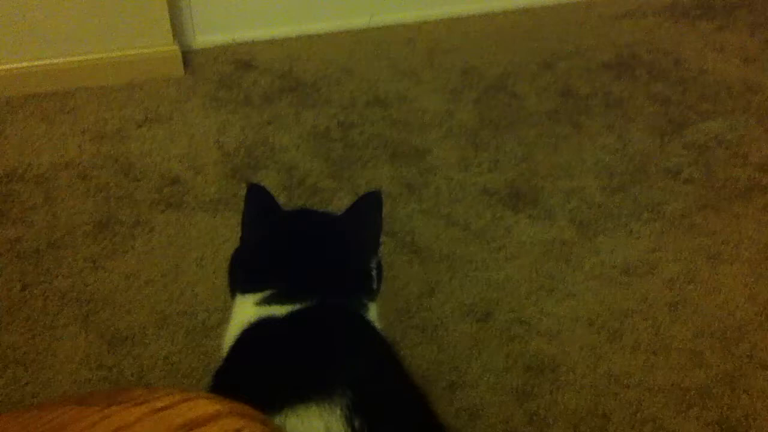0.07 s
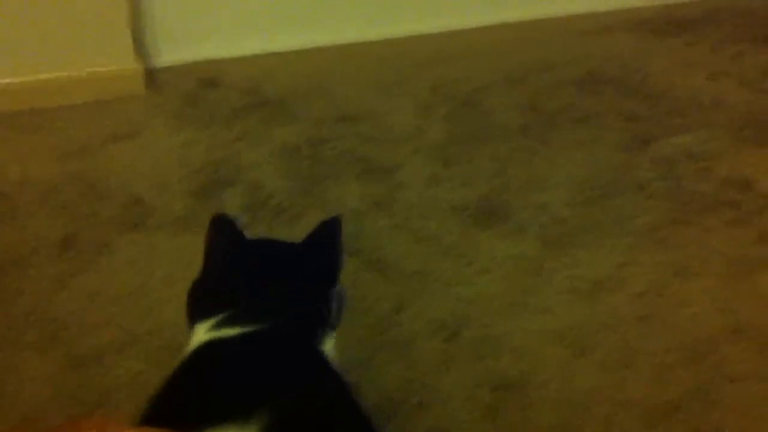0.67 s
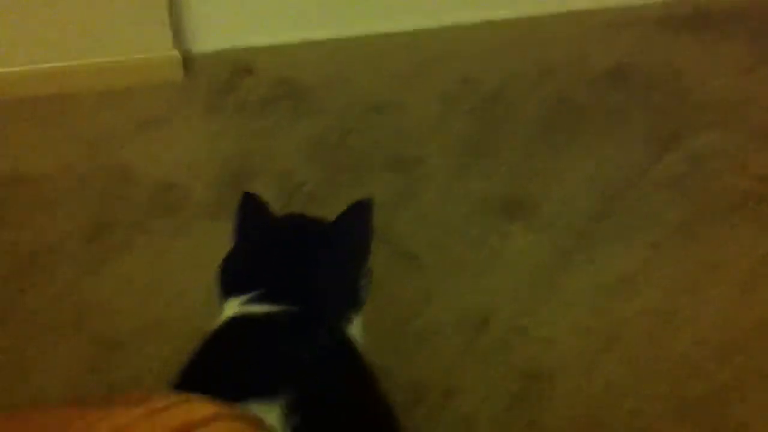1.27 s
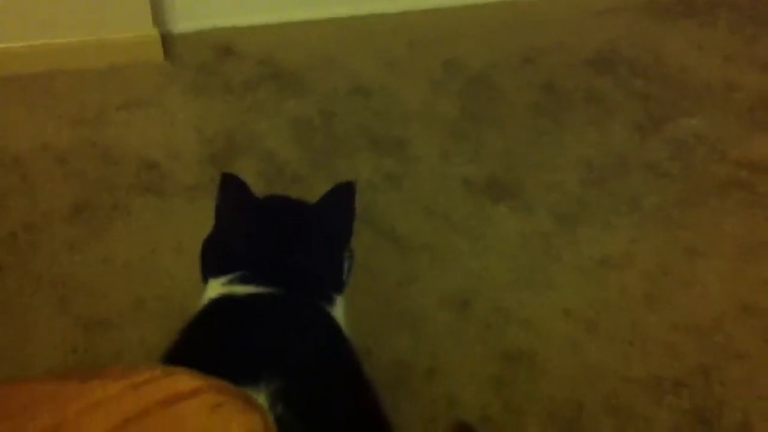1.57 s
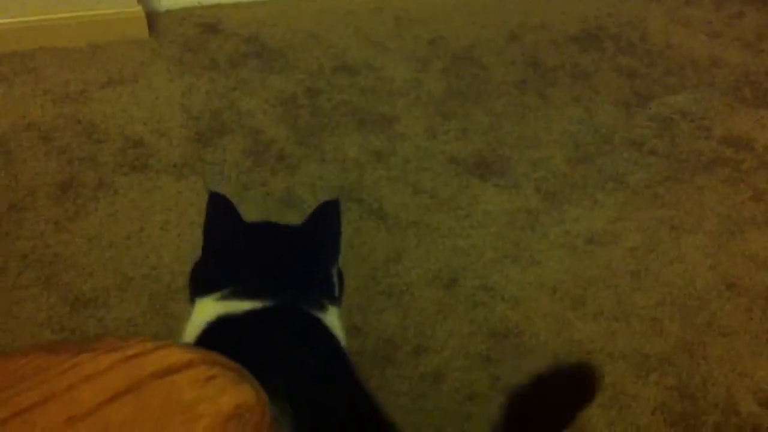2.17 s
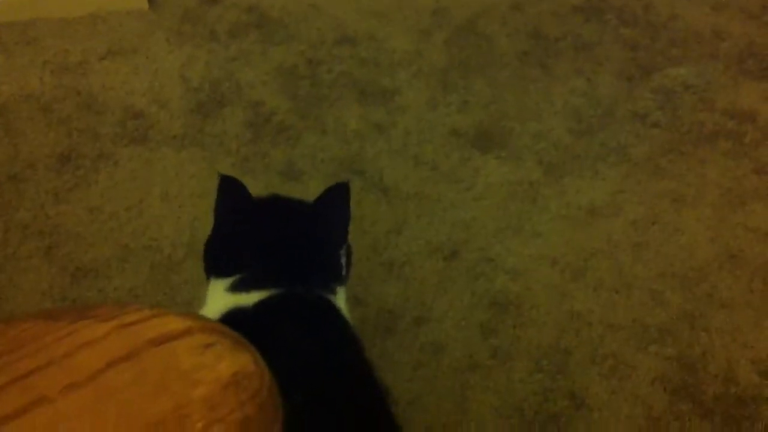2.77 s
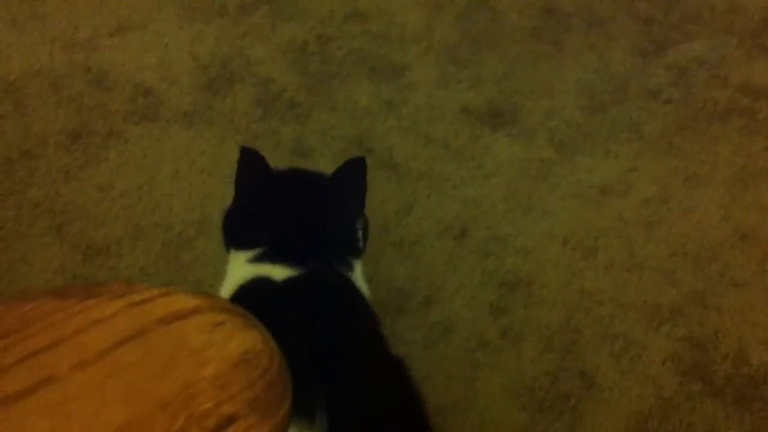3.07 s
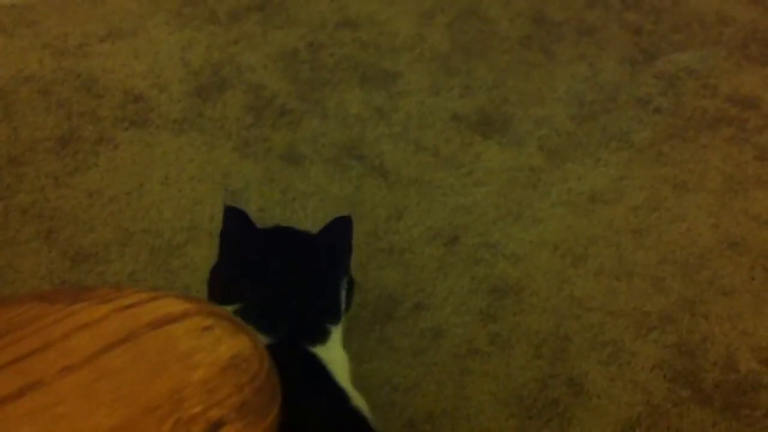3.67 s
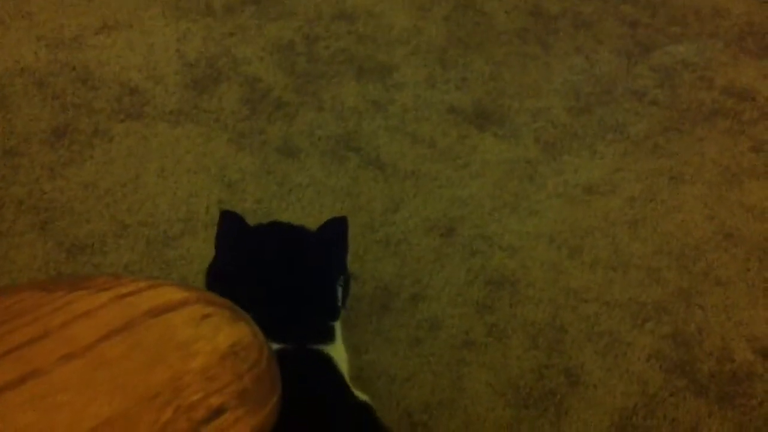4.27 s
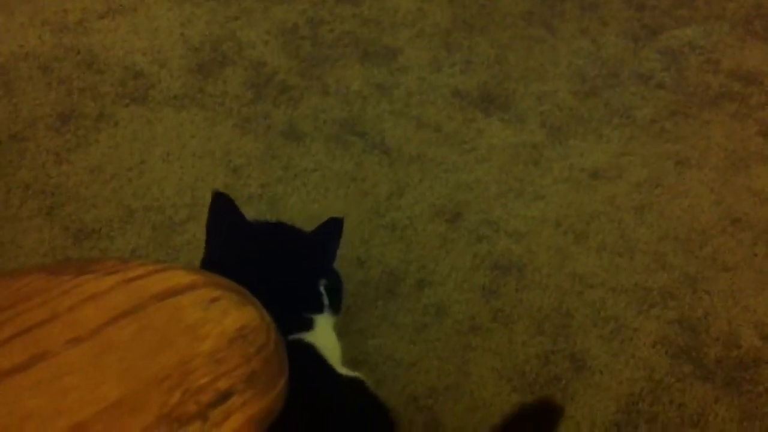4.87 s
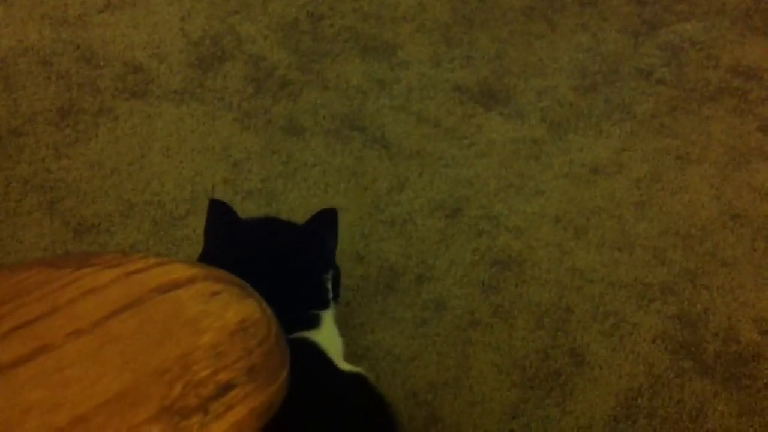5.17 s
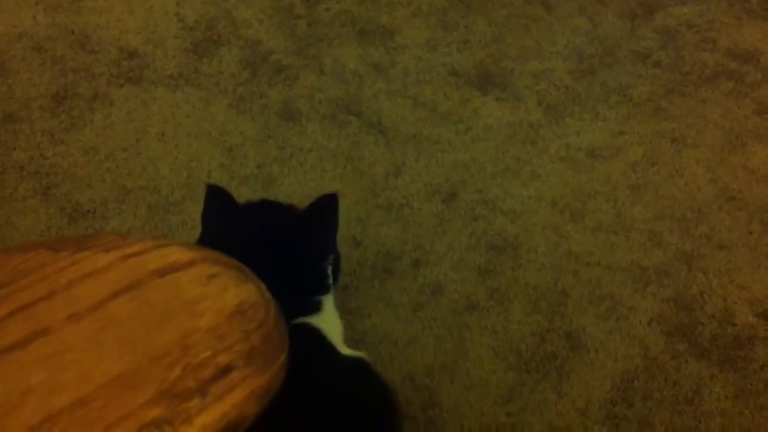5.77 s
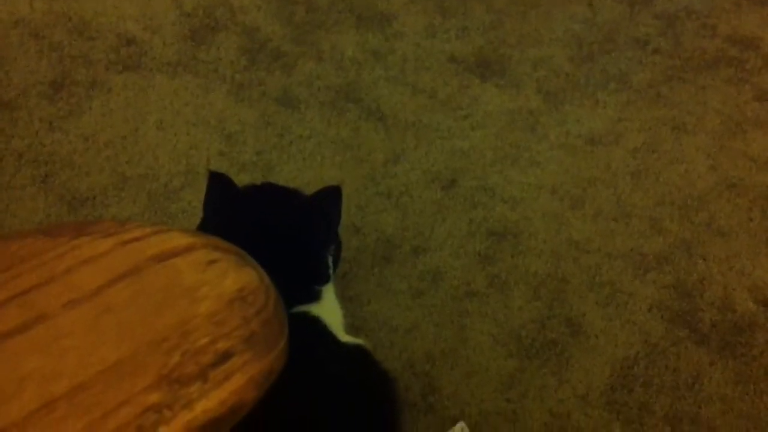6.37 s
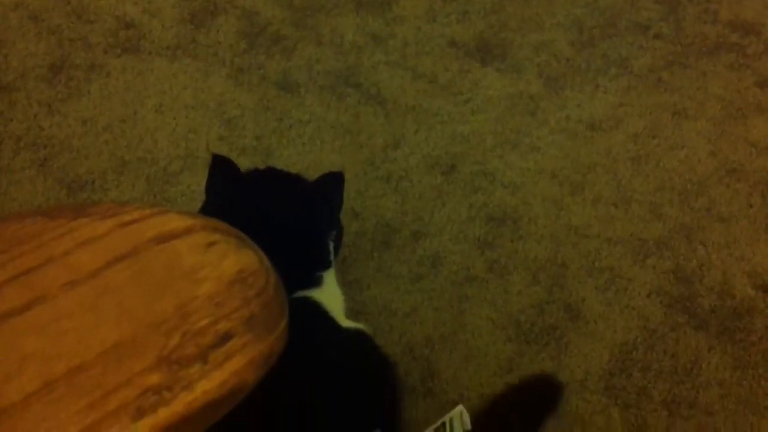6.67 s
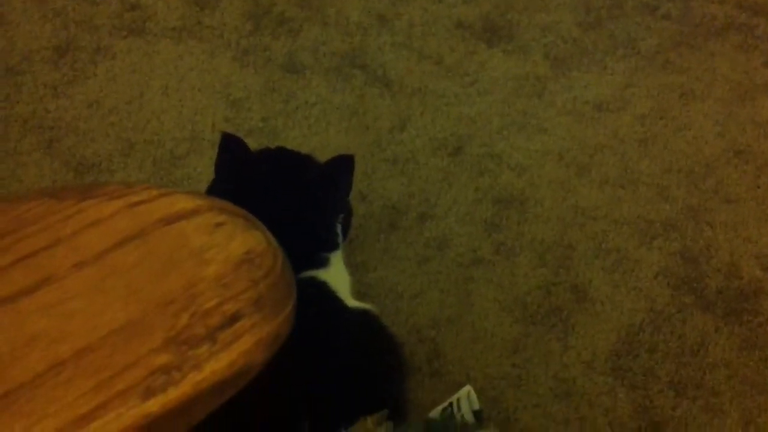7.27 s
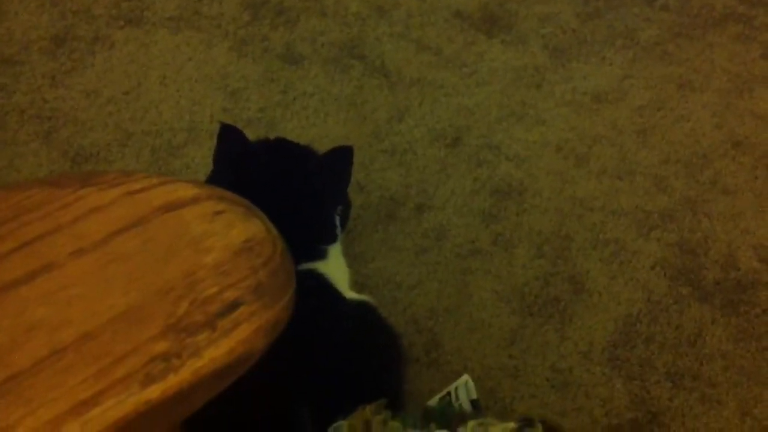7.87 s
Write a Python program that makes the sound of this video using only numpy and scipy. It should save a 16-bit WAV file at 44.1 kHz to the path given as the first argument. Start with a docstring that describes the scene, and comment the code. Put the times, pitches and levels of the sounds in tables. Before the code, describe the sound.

A cat gives faint, squeaky chirps at irregular intervals in a quiet room, after one sharp click, over a low ventilation hum.

```python
"""A cat chirping in a quiet room

A cat on a carpet chirps at something: its vocal folds buzz in short squeaks, some clear, some hoarse,
shaped by its throat and mouth. It also coos once with its mouth shut. The room echoes each call.
A hand bumps the phone at the start. Ventilation murmurs, with a thin electric whine and microphone hiss."""
import sys
import numpy as np
from scipy import signal
from scipy.fft import rfft, irfft, next_fast_len
from scipy.io import wavfile

SR = 44100
rng = np.random.default_rng(int(sys.argv[2]) if len(sys.argv) > 2 else 0)


def dump(signal):
    """Clip the signal to [-1, 1] and save it as 16-bit WAV at the path in sys.argv[1]."""
    limited = np.clip(np.atleast_2d(signal).T, -1, 1)
    pcm = np.round(limited * 32767).astype(np.int16)
    wavfile.write(sys.argv[1], SR, pcm)


N = 349713
T = np.arange(N) / SR

# The cat's chirps: start_s, length_s, opening_pitch_hz, held_pitch_hz, level_db, swell_db,
# roughness_0_to_1, throat_db, mouth_hz, mouth_db, upper_hz, upper_db (the last five set the resonances)
CAT_CHIRPS = [ (1.122, 0.052, 588, 526, -60, 7, 0.35, 4, 2120, 2, 4020, 3),
              (1.586, 0.079, 604, 576.4, -58, 5.5, 0.24, 4, 1890, -4.5, 3780, 4.5),
              (1.954, .058, 548, 466, -58.5, 14.5, 0.16, 14, 1870, 6, 4400, 6),
              (2.612, 0.058, 559, 469.5, -52.3, 7.5, 0.32, 6, 2260, 7.5, 3750, 5),
              (3.204, 0.074, 549, 581, -65, 5, 0.4, 11.5, 2170, -4, 4350, 4),
              (3.431, 0.087, 445, 481.6, -58.5, 5, 0.16, 6, 1870, -0.5, 3670, 7.5),
              (4.578, 0.044, 564, 563, -72, 0, .8, -8, 2310, 0, 3960, 1),
              (4.761, 0.083, 508.5, 531, -55, 7.5, .09, -6.5, 2000, -5, 4750, 0.5),
              (5.905, 0.099, 599, 568, -57, 4, 0.2, -5, 2300, 6, 3750, 1.5),
              (7.324, 0.078, 541, 561, -53, 6, 0.17, -8, 2290, 4.5, 3750, 4),
              (7.751, .097, 547, 533.3, -60, 8, 0.13, -0.5, 1800, -5, 3290, -0.5)]
# Soft calls with the mouth shut: start_s, length_s, opening_pitch_hz, closing_pitch_hz, level_db
CAT_COOS = [(3.79, .095, 368, 432, -61)]
# The tone of the voice between its resonances: frequency_hz, gain_db
VOICE_SPECTRUM = [(200, -42), (500, -14), (1000, -22), (1600, -10), (3000, -10), (4200, -12), (5400, -21),
                  (6500, -34), (9000, -43), (14000, -54)]
# The resonances during a rasp: throat_db, mouth_hz, mouth_db, upper_hz, upper_db
RASP_RESONANCES = (8, 2402, -16, 5400, 3)
# Bumps on the phone's case: start_s, strength_db, contact_ms
CASE_BUMPS = [(0.383, -46, 3.9), (.4115, -44.5, 1.6), (0.4676, -34, 3.3), (.5238, -35, .4),
              (.526, -33.5, .9), (.5354, -19, 2.4), (0.5491, -14, 1.8), (0.5512, 0.5, 0.46)]
# What the case passes to the microphone: frequency_hz, gain_db
CASE_SPECTRUM = [(140, 2), (330, -3.5), (540, -4.5), (1000, -11), (1700, -14), (2600, -20.5), (4000, -23.5),
                 (8000, -27), (16000, -33.5)]
# The tone of the ventilation: frequency_hz, gain_db
VENT_SPECTRUM = [(25, -35.5), (50, -32), (80, -27.5), (115, -16), (160, -5.5), (210, -2.5), (270, 1.5),
                 (350, -2), (460, -11), (680, -14.5), (1000, -18.5), (2000, -28), (5000, -34.5)]
# How loud the ventilation is over time: time_s, level_db
VENT_LEVELS = [(.1, -68.5), (.35, -65.5), (.6, -62), (1.2, -63.5), (2.5, -61), (7.9, -61.5)]
# Electric hum and whine: pitch_hz, level_db (against the ventilation)
HUM_TONES = [(118.4, -17), (280, -10.5), (588, -23.5), (705, -20.5), (1879, -27.5), (2762, -23.5),
             (14998, -34.5)]
# The tone of the microphone's hiss: frequency_hz, gain_db
HISS_SPECTRUM = [(100, -0.5), (2000, 0), (4000, -0.5), (7000, -3), (9000, -4), (11000, -6.5), (15500, -4.5)]


def cat(hoarse_below_hz=500, rasp_s=0.052, overlap_s=0.00208):
    """All the calls, heard through the room; low chirps break into a rasp as the mouth closes."""
    calls = np.zeros(N)
    for start_s, length_s, open_hz, held_hz, db, swell_db, roughness, *resonances in CAT_CHIRPS:
        add(calls, start_s, chirp(length_s, open_hz, held_hz, db, resonances, swell_db, roughness))
        if held_hz < hoarse_below_hz:
            rasp = chirp(rasp_s, held_hz, held_hz, db - 10, RASP_RESONANCES, swell_db=-8, roughness=0.64)
            add(calls, start_s + length_s - overlap_s, rasp)
    for start_s, *call in CAT_COOS:
        add(calls, start_s, coo(*call))
    return room(calls)


def chirp(length_s, open_hz, held_hz, db, resonances, swell_db, roughness,
          settle_s=.023, attack_s=.003, shimmer_db=2.8, flutter_db=3, size=6000):
    """The vocal folds buzz and settle on a note; if they close badly, it shakes and air rasps through."""
    t = np.arange(size) / SR
    progress = np.clip(t / length_s, 0, 1)
    pitch_hz = held_hz + (open_hz - held_hz) * np.exp(-(t / settle_s) ** 2)
    wobble = .006 * wander(size, 67) + .07 * roughness * wander(size, 404)
    phase = 2 * np.pi * np.cumsum(pitch_hz * (1 + wobble)) / SR
    # the cat faces away: its harmonics arrive by detours, out of step, each swelling and dipping alone
    buzz = sum(np.cos(k * phase + 2 * np.pi * rng.random()) * undb(shimmer_db * wander(size, 76))
               for k in range(1, 17))
    breath = rng.standard_normal(size) * (1 + np.cos(phase))  # one puff per cycle
    clear = max(1 - roughness, 0) * throat_and_mouth(buzz, progress, *resonances)
    hoarse = 1.2 * roughness * throat_and_mouth(breath, progress, *resonances)
    fade = np.clip(t / attack_s, 0, 1) * np.clip((1 - progress) / .25, 0, 1)
    effort = undb(swell_db * progress + flutter_db * roughness * wander(size, 145))
    voice = (clear + hoarse) * fade * effort
    return undb(db) * unit(voice[t < length_s])


def throat_and_mouth(source, opening, throat_db, mouth_hz, mouth_db, upper_hz, upper_db,
                     throat_hz=1000, jaw_db=6, size=8192):
    """The mouth rings at once; the throat and the upper resonance grow as the jaw drops."""
    hz = np.fft.rfftfreq(size, 1 / SR) + 1
    spectrum = rfft(source, size)
    mouth = contour(VOICE_SPECTRUM, hz) + undb(mouth_db) * resonance(hz, mouth_hz, width_hz=600)
    throat = undb(throat_db) * resonance(hz, throat_hz, width_hz=330)
    upper = undb(upper_db) * resonance(hz, upper_hz, width_hz=520)
    steady = irfft(spectrum * mouth)[:len(source)]
    growing = irfft(spectrum * (throat + upper))[:len(source)]
    return unit(steady + growing * undb(jaw_db * (opening - 1.5)))


def coo(length_s, open_hz, close_hz, db):
    """With the mouth shut, only the voice's lowest tone gets out, sliding upward."""
    progress = np.linspace(0, 1, int(length_s * SR))
    phase = 2 * np.pi * np.cumsum(open_hz + (close_hz - open_hz) * progress) / SR
    return undb(db) * unit(np.sin(phase) * np.sin(np.pi * progress))


def room(voice, early_s=0.12, early_db=-10, late_s=0.47, late_db=-3.5, delay_s=0.0041):
    """Near walls and furniture throw the voice back at once; a longer wash of echoes follows."""
    t = np.arange(SR // 2) / SR
    echoes = 0
    for fade_s, db in ((early_s, early_db), (late_s, late_db)):
        fade = np.exp(-np.log(1000) * t / fade_s)  # 60 dB down after fade_s
        tail = rng.standard_normal(len(t)) * fade * (t > delay_s)
        echoes = echoes + undb(db) * tail / np.linalg.norm(tail)
    return voice + signal.fftconvolve(voice, echoes)[:N]


def hand_on_phone(light_below_db=-30, rub_db=-56, snap_db=-47, crackle_db=-57):
    """Fingers shift on the case: light ticking touches, a short rub, one hard click, a fine crackle."""
    bumps, case = np.zeros(N), case_ring()
    for start_s, db, contact_ms in CASE_BUMPS:
        add(bumps, start_s, bump(case, db, contact_ms))
        if db < light_below_db:  # a light touch begins with a bright tick
            add(bumps, start_s, bump(case, db - 9, contact_ms=.15))
    slips = unit(rng.standard_normal(N) ** 3)  # cubing makes the noise spiky
    rub = signal.fftconvolve(slips * burst(.538, width_s=0.025), case)[:N]
    rub = keep_band(rub, "low", 4500, order=1)
    # the last, hardest bump snaps brightly, and the plastic crackles as it springs back
    bright_noise = keep_band(rng.standard_normal(N), "high", 3000)
    snap = signal.fftconvolve(bright_noise * burst(CASE_BUMPS[-1][0], width_s=0.0017), case)[:N]
    crackle = keep_band(slips, "high", 3000) * burst(.565, width_s=0.0046)
    touches = bumps + undb(rub_db) * rub + undb(snap_db) * snap + undb(crackle_db) * crackle
    return keep_band(touches, "high", 82)


def bump(case, db, contact_ms):
    """One push on the case; a longer push gives a duller bump."""
    ms = np.arange(SR // 100) * 1000 / SR
    push = np.sin(np.pi * np.minimum(ms / contact_ms, 1)) ** 2
    sound = np.convolve(case, push)
    return -undb(db) * sound / np.abs(sound).max()


def case_ring(bass_cut_hz=135, size=4096):
    """How the case rings after a sharp tap, heard through the microphone's bass cut."""
    gains = contour(CASE_SPECTRUM, np.fft.rfftfreq(size, 1 / SR))
    # turn the gains into a ring that comes only after the tap (minimum phase)
    cepstrum = irfft(np.log(gains))
    cepstrum[1:size // 2] *= 2
    cepstrum[size // 2 + 1:] = 0
    ring = irfft(np.exp(rfft(cepstrum)))
    ring = keep_band(ring, "high", bass_cut_hz, order=3)
    return ring / np.abs(ring).max()


def ventilation(sway_db=1.22, drift_hz=1.7):
    """Moving air murmurs and sways gently, while motor and mains tones waver."""
    air = noise(VENT_SPECTRUM) * undb(sway_db * wander(N, 7.2))
    hum = 0
    for pitch_hz, db in HUM_TONES:
        phase = 2 * np.pi * np.cumsum(pitch_hz + drift_hz * wander(N, 2.8)) / SR
        hum = hum + undb(db) * unit(np.sin(phase))
    return (air + hum) * undb(np.interp(T, *np.transpose(VENT_LEVELS)))


def microphone_hiss(level_db=-70.5):
    """The microphone adds a faint, steady hiss of its own."""
    return undb(level_db) * noise(HISS_SPECTRUM)


def undb(db):
    """Turn decibels into a gain to multiply by."""
    return 10 ** (np.asarray(db) / 20)


def unit(x):
    """Scale a sound so its average strength (rms) is 1."""
    return x / np.sqrt(np.mean(x ** 2) + 1e-30)


def add(track, start_s, sound):
    """Mix a sound into the track at start_s."""
    i = int(start_s * SR)
    track[i:i + len(sound)] += sound[:N - i]


def wander(size, hz):
    """A random drift, roughly 1 either way, that picks a new value hz times a second."""
    return np.interp(np.arange(size) / SR * hz, np.arange(size), rng.standard_normal(size))


def burst(centre_s, width_s):
    """A smooth rise and fall around centre_s."""
    return np.exp(-((T - centre_s) / width_s) ** 2)


def contour(points, hz):
    """Read the gains at hz off a table of frequency_hz, gain_db."""
    points_hz, db = np.transpose(points)
    return undb(np.interp(np.log(hz + 1), np.log(points_hz), db))


def resonance(hz, centre_hz, width_hz):
    """A steep peak of gain, 1 at its centre."""
    return 1 / (1 + ((hz * hz - centre_hz * centre_hz) / (hz * width_hz)) ** 2)


def keep_band(x, side, edge_hz, order=2):
    """Keep the "low" or "high" side of edge_hz; a higher order cuts more steeply."""
    return signal.sosfilt(signal.butter(order, edge_hz, side, fs=SR, output="sos"), x)


def noise(points):
    """Noise of strength 1, shaped by a table of frequency_hz, gain_db."""
    size = next_fast_len(N, True)
    gains = contour(points, np.fft.rfftfreq(size, 1 / SR))
    return unit(irfft(rfft(rng.standard_normal(size)) * gains, size)[:N])


def scene():
    """Cat, hand and background at one microphone."""
    return (cat() + hand_on_phone() + ventilation() + microphone_hiss())[None]


def record(dry, start_s=.12, top_hz=15800):
    """The phone opens its microphone a moment late and cuts the highest treble."""
    treble_cut = signal.ellip(10, .1, 60, top_hz, fs=SR, output="sos")
    return signal.sosfilt(treble_cut, dry * (T > start_s))


dry = scene()
out = record(dry)
dump(out)
```